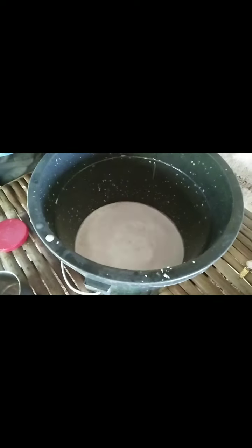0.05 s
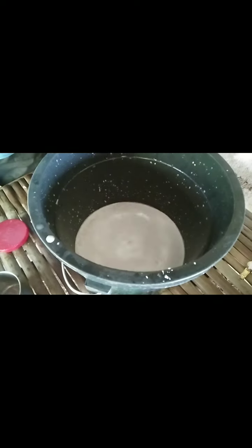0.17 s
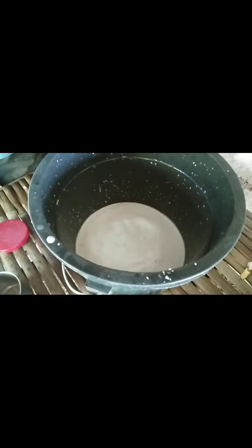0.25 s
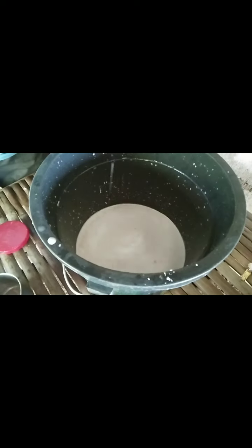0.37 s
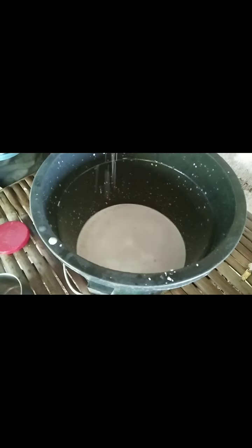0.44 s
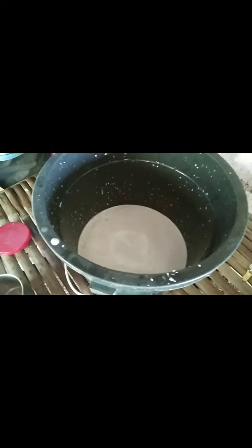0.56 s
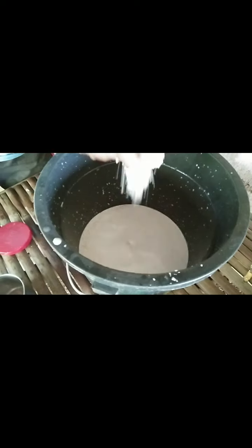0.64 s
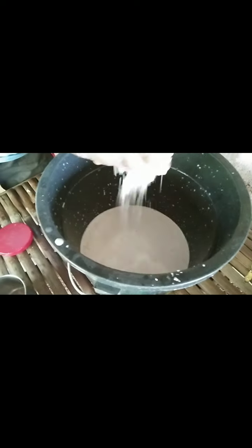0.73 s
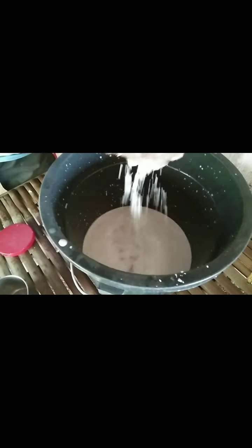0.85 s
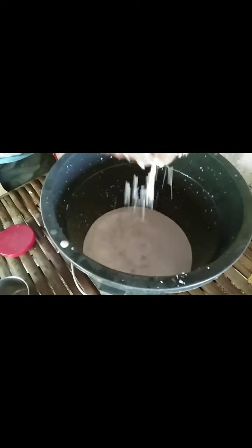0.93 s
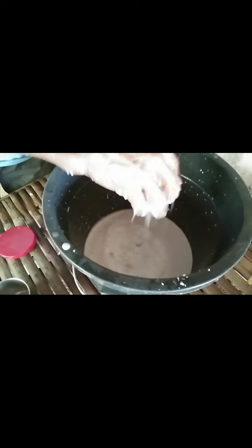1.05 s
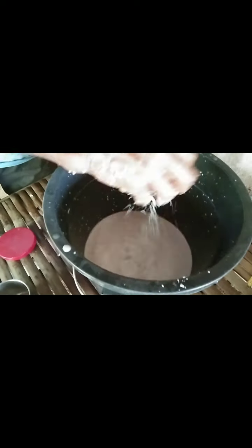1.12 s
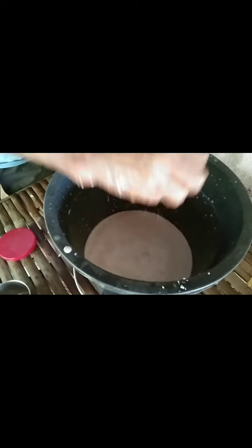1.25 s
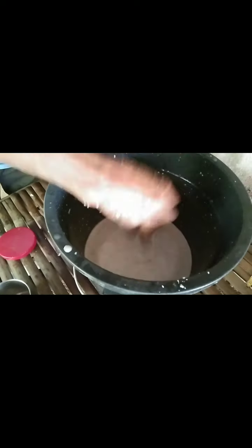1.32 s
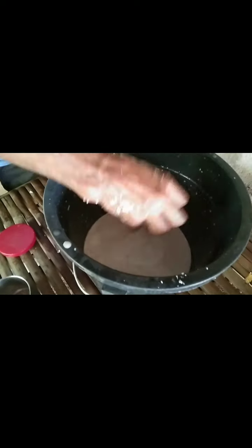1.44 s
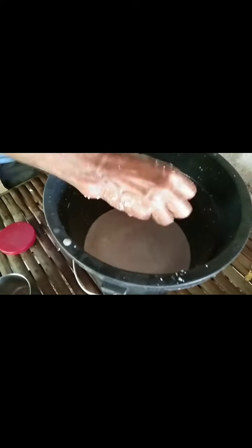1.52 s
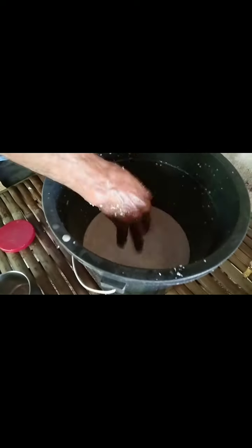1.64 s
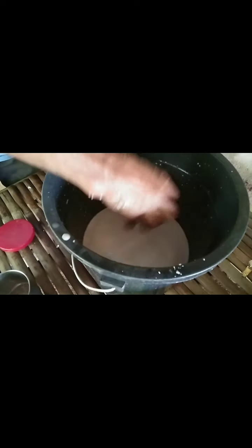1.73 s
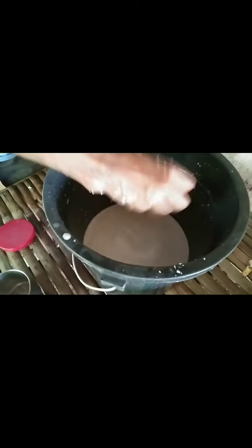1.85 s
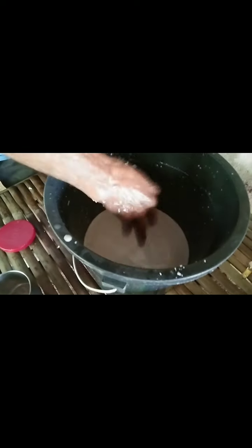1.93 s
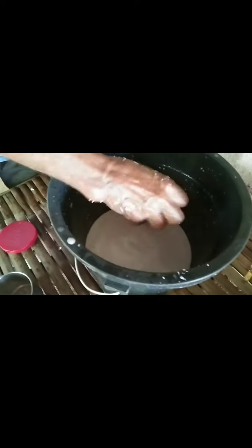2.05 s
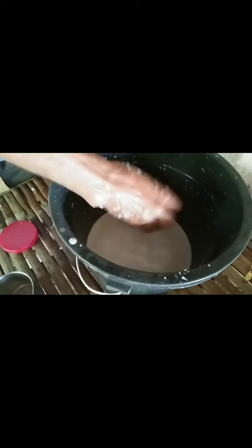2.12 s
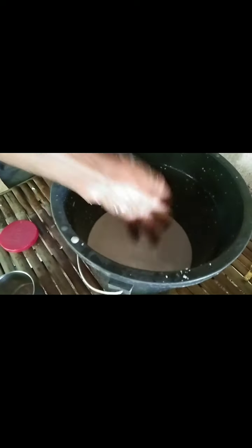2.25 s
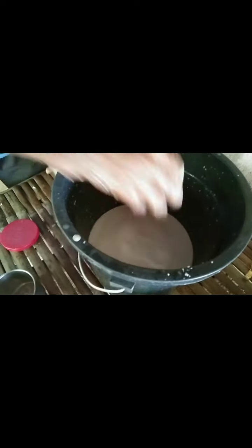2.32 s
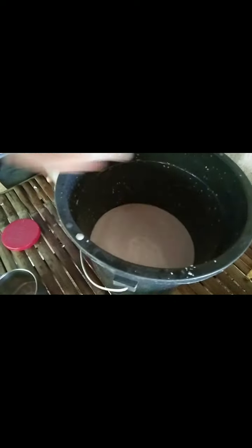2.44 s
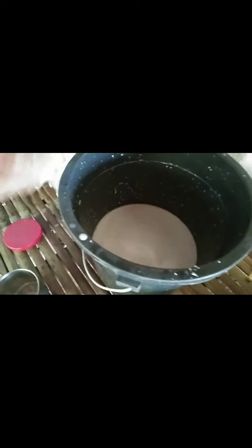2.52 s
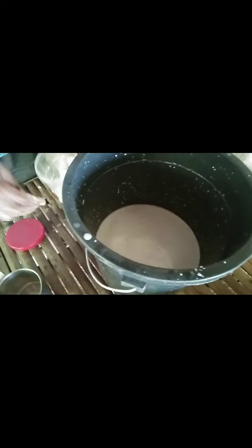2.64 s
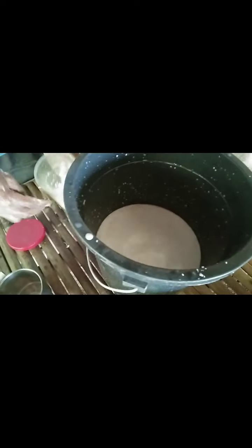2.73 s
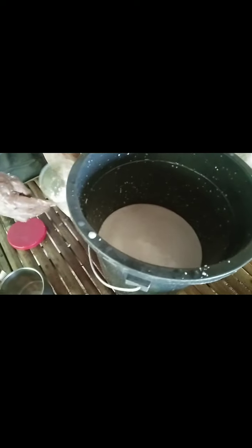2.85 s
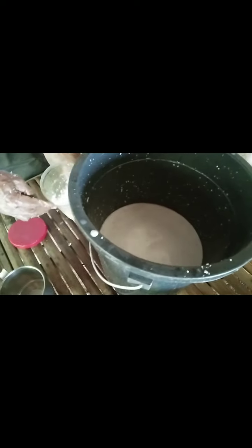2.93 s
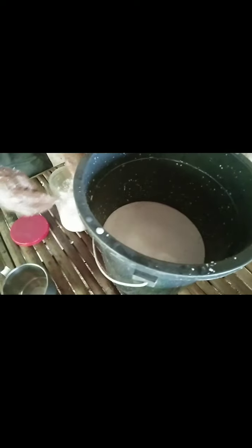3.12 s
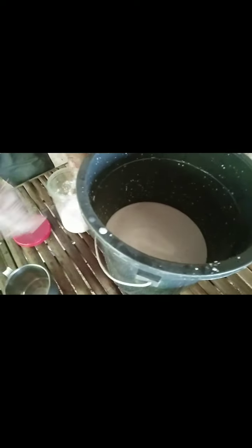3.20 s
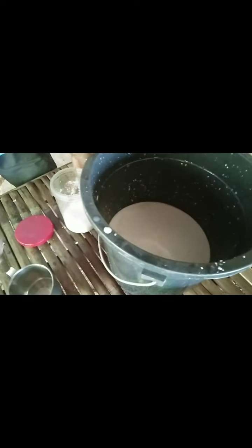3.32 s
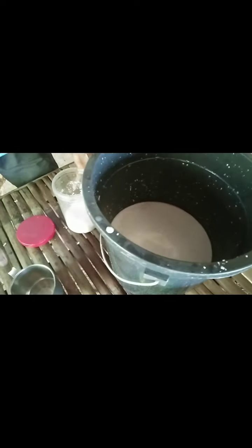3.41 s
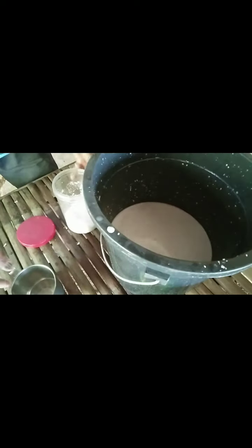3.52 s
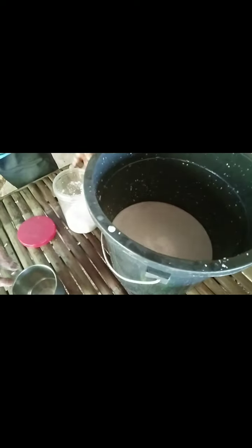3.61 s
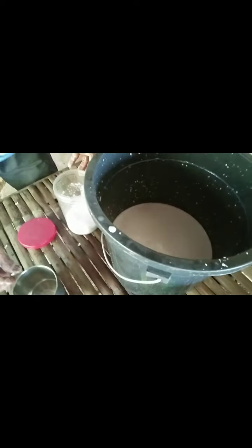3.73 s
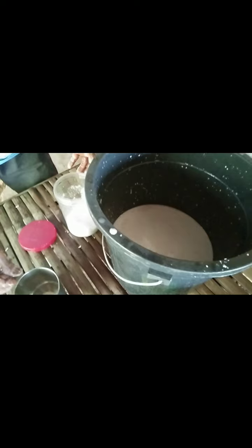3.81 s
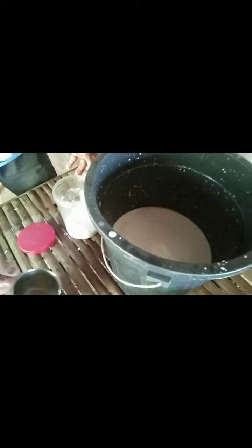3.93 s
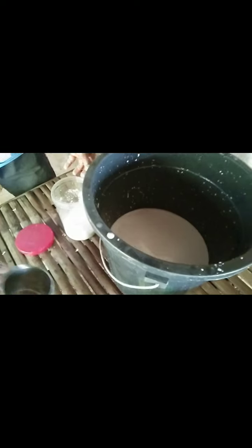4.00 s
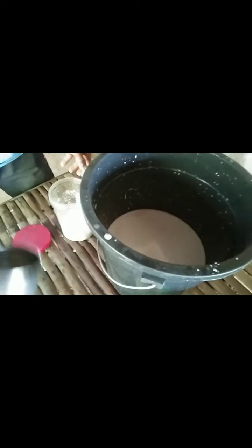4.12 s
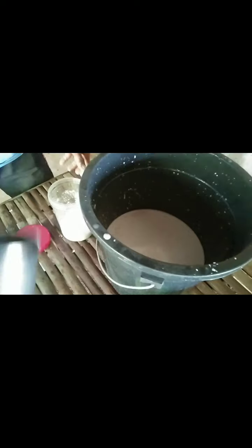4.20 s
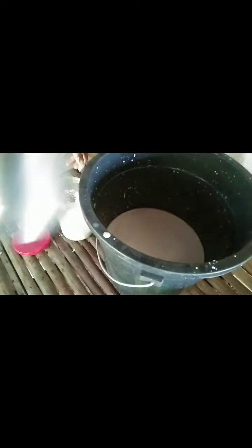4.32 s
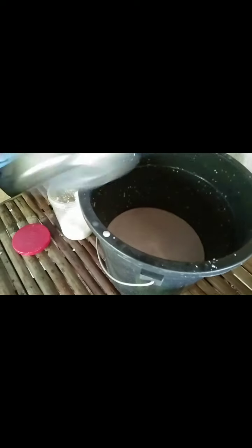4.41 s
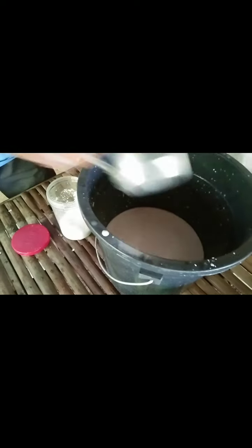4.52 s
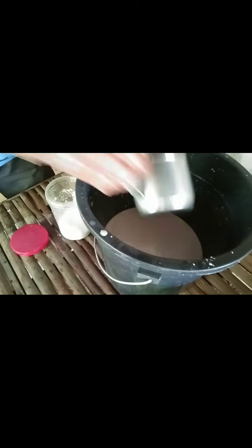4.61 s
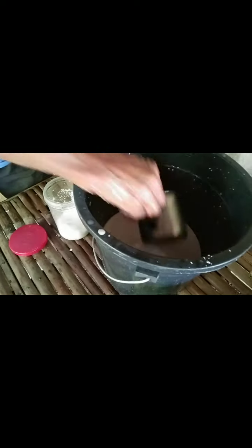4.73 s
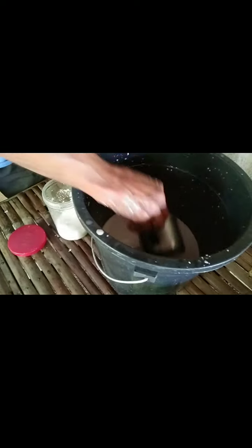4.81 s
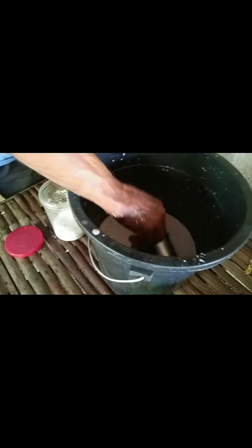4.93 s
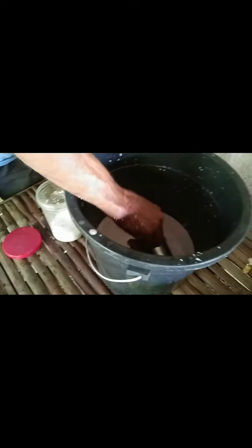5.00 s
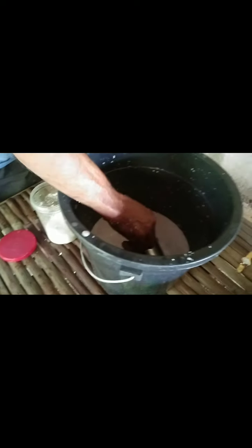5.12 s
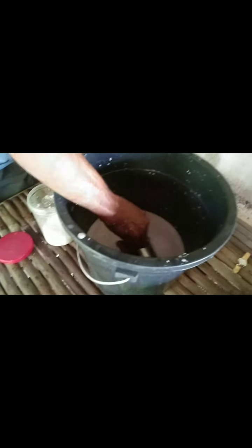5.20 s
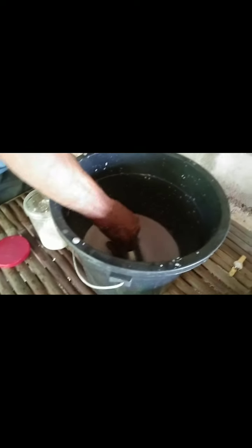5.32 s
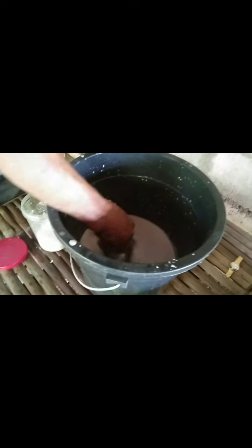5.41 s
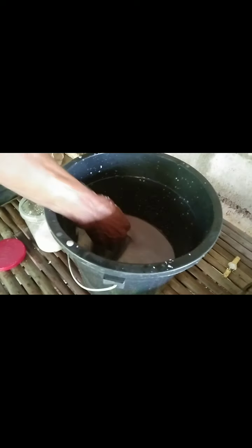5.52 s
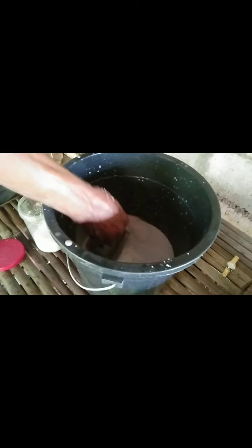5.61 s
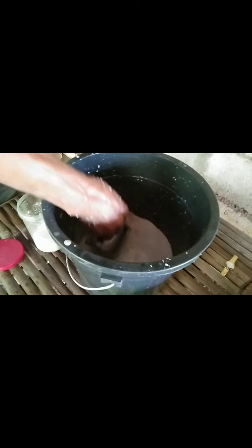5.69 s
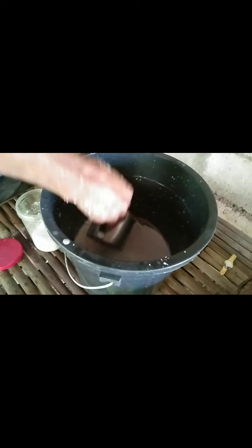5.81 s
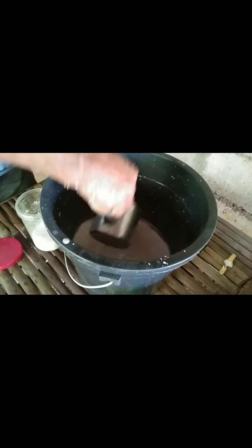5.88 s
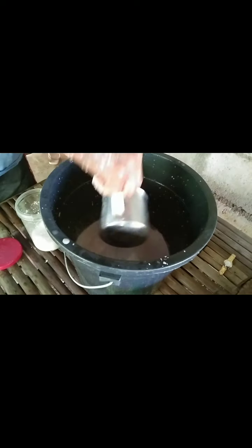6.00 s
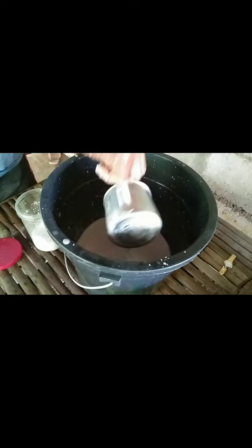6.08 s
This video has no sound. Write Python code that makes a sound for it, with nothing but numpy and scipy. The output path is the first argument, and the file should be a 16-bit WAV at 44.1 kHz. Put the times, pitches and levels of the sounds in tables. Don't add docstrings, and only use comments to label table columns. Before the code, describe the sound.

Soft wet ticks and rubbing hiss, a sharp plastic lid clatter, a brief steel ring, then gurgling, splashing stirring in a bucket, with distant roosters.

```python
import sys
import numpy as np
from scipy import signal
from scipy.fft import rfft, irfft, next_fast_len
from scipy.io import wavfile
from scipy.ndimage import uniform_filter1d, map_coordinates

SR = 44100
rng = np.random.default_rng(int(sys.argv[2]) if len(sys.argv) > 2 else 0)


def magnitude_from_level(level_db):
    exponent = np.asarray(level_db, float) / 20
    return 10 ** exponent


def persist_wave(psi):
    counts = np.round(np.clip(psi, -1, 1) * 32767).astype(np.int16)
    wavfile.write(sys.argv[1], SR, np.atleast_2d(counts).T)


N = 271215
TIME_S = np.arange(N) / SR

# freq_hz, level_db
RUMBLE_SPECTRUM = [(13, -60.5), (22, -11.5), (27, -25), (58, -0.5), (75, 1.5), (162, -0.5), (222, -3.5),
                   (330, -24), (430, -56), (730, -120)]
# freq_hz, density_db_per_hz
FLOOR_SPECTRUM = [(250, -8.5), (500, -7), (1200, -19.5), (2500, -14), (4300, -10), (5600, -13), (7400, 5),
                  (8600, -21.5), (16000, -48)]
# freq_hz, density_db_per_hz
LEAF_SPECTRUM = [(5500, -50), (6700, -11), (7500, 1.5), (8100, -13), (9000, -50.5)]
# peak_s, level_db, rise_20db_s, fall_20db_s
GUSTS = [
    (2.75, -59.5, 0.35, -0.4),
    (3.7, -70.5, 0.25, 0.6),
    (4.73, -61.5, .02, 0.5),
]
RUMBLE_DB, FLOOR_DB = -62.5, -77

# start_s, length_s, second_harmonic_hz, level_db
CROWS = [
    (0.01, 0.435, 1430, -85.5),
    (0.442, 0.23, 1890, -76.5),
    (0.79, 0.21, 1746, -79.5),
    (1.193, 0.51, 1704, -80.5),
    (1.593, 0.41, 1376, -89),
    (1.98, 0.24, 1604, -79),
    (2.403, 0.52, 1744, -74),
    (3.453, 0.39, 1513, -75.5),
    (4.22, 0.2, 1366, -83),
]
# start_s, length_s, pitch_hz, level_db
CLUCKS = [
    (.12, .1, 620, -75),
    (.36, .17, 455, -73),
    (1.16, .14, 530, -74),
    (2.9, .2, 520, -76),
]
# start_s, length_s, level_db
CHORUS = [
    (0.243, 0.4, -78.5),
    (0.77, 0.35, -78.5),
    (1.07, 0.86, -75.5),
    (2.19, 0.86, -74.5),
    (2.801, .4, -73.5),
    (3.68, 0.76, -72.5),
    (4.451, 0.92, -74.5),
]
# freq_hz, density_db_per_hz
CHORUS_SPECTRUM = [(400, -70), (560, -41), (700, -2.5), (790, 5), (880, -8.5), (1000, -44), (1500, -70)]
CROW_EDGE_S, CROW_FADE_DB = 0.11, -4.5
CROW_SAG = 0.0299

# freq_hz, t60_s
YARD_T60 = [(200, 0.64), (2000, 0.26), (7000, 0.15), (14000, 0.075)]

# start_s, peak_db, pitch_hz, t60_s
KNOCKS = [(1.331, -42.5, 131, 0.026), (1.779, -43, 103, 0.076), (2.232, -42.5, 231, 0.047),
          (2.812, -31, 240, 0.063), (2.838, -28, 169, 0.06), (3.269, -19.5, 211, 0.034),
          (3.617, -56.5, 129, 0.047), (3.908, -40, 196, 0.064), (4.118, -47, 93.3, 0.064),
          (4.482, -45, 774, 0.1), (4.691, -44, 91.3, 0.11), (5.189, -49.5, 91, 0.15),
          (5.475, -37.5, 603, 0.073), (5.82, -33, 1000, 0.021)]

# start_s, peak_db, bench_db, edge_pitch_hz
LID_BLOWS = [
    (3.1762, -22, -3.5, 5000),
    (3.1812, 2, -30, 6210),
    (3.186, -9, -15.5, 7000),
    (3.2225, 1, -20, 4110),
    (3.231, -13, -17.5, 4140),
    (3.2907, -11, -24, 4100),
    (3.319, -8, -14, 4400),
    (3.361, -23, -26.5, 5500),
    (3.368, -16, -19.5, 4100),
]
# freq_hz, width_hz, level_db
LID_MODES = [(2370, 110, -1), (2850, 50, -1), (4100, 500, -8.5), (5050, 260, -3), (6200, 600, -3),
             (7200, 600, -3), (8230, 460, -7.5)]
# freq_hz, density_db_per_hz
LID_SPECTRUM = [(350, -30), (750, -7), (1240, -9), (2600, -8), (3300, -7), (4300, -5), (6500, -8),
                (8300, -12), (13800, -32.5), (16000, -58)]
# freq_hz, width_hz, level_db
BENCH_MODES = [(115, 180, -8.5), (207, 42, -5.5), (477, 150, -2), (860, 56, -3.5), (1290, 200, 1)]
EDGE_DB, EDGE_T60_S = -6.5, 0.012

# freq_hz, level_db, t60_s
RIM_MODES = [(4830, -7.5, .5), (5470, -15, .4), (6288, -8, .3), (6560, -8, .4), (6918, 2.5, .3),
             (7240, -8, .7), (8050, -10, .2), (8270, -5, .3), (9150, -19, .2), (9437, -14, .25),
             (10410, -25, .2), (10700, -22, .3), (11500, -22, .2), (12700, -31, .2)]
# freq_hz, level_db, t60_s
WALL_MODES = [(1243, -7.5, 0.1), (1460, -2, 0.13), (2085, 2, 0.33), (2160, -5, .05), (2570, -4.5, 0.86),
              (2680, 2.5, .053), (2970, -3, 0.29), (3540, -8, .2), (4330, -12, .2), (4818, -2, 1),
              (5500, -15, .3)]
# start_s, level_db
TAPS = [
    (3.909, -57),
    (3.998, -53),
]
# peak_s, level_db, rise_20db_s, fall_20db_s
JERK = (4, -37.5, -0.0032, 0.12)

# start_s, peak_db, pitch_hz, t60_s, rise_share (pitch gains twice this by t60_s)
BUBBLES = [(5.225, -35, 3194, 0.072, 0.14), (5.2855, -22.5, 841, 0.025, 0.17),
           (5.302, -36, 916, 0.068, 0.51), (5.392, -36.5, 2780, 0.078, 0.068), (5.406, -41, 2510, .04, .05),
           (5.448, -30.5, 367, 0.048, 0.27), (5.457, -38.5, 532, 0.062, 0.27),
           (5.474, -33, 1155, 0.044, 0.066), (5.492, -39, 900, .04, .4), (5.505, -36.5, 1347, 0.067, 0.093),
           (5.538, -32, 1697, 0.054, 0.098), (5.595, -39, 1216, .04, .2), (5.759, -37.5, 1097, 0.088, 0.38),
           (5.799, -39.5, 830, 0.028, 0.17), (5.819, -33, 1740, .04, 0.14), (5.878, -42, 3220, .05, 0.14),
           (5.962, -41, 1750, 0.032, 0.057), (5.988, -39.5, 1243, 0.044, 0.24),
           (6.006, -44.5, 830, 0.16, 0.031), (6.041, -28, 1285, 0.025, .1),
           (6.089, -36.5, 820, 0.063, 0.0091), (6.115, -37, 2570, 0.047, 0.13), (6.132, -45.5, 827, .1, 0)]
# start_s, peak_db, pitch_hz, t60_s
PLOPS = [(1.0, -47, 1785, 0.084), (1.232, -53, 2175, 0.2), (2.841, -43, 518, 0.065),
         (2.813, -43.5, 518, 0.056), (2.82, -64.5, 2590, 1.0), (2.842, -52, 1010, 0.045),
         (2.929, -47, 4685, 0.068), (3.79, -62.5, 9230, 0.26), (3.8, -56.5, 6330, 0.24),
         (4.49, -53, 570, 0.19), (4.495, -54, 1118, 0.22), (4.5, -55.5, 1944, 0.13), (4.5, -55, 2940, 0.1),
         (4.505, -44, 3700, 0.13), (4.685, -61.5, 818, 0.092), (4.69, -70, 2400, 0.19),
         (4.69, -63.5, 4330, 0.11), (2.815, -52, 2190, 0.17), (3.915, -53, 645, 0.096)]
# from_s, to_s
SLOSH_FROM_S, SLOSH_TO_S = (5.2, 6.15)

# start_s, peak_db, pitch_hz
DRIPS = [
    (4.293, -48, 6290),
    (4.498, -43.5, 3750),
    (4.555, -42.5, 7300),
    (4.8319, -37.5, 6880),
    (4.9851, -23, 7340),
    (5.1824, -40.5, 4660),
]
# start_s, peak_db, pitch_hz
SPATTER = [(5.2148, -42, 5170), (5.2259, -32.5, 3330), (5.3052, -41.5, 6140), (5.3144, -39, 7340),
           (5.3603, -42, 4600), (5.3714, -42, 4970), (5.3805, -33.5, 6400), (5.3915, -30.5, 6640),
           (5.4053, -31, 6660), (5.4077, -35.5, 2810), (5.4396, -35, 6800), (5.448, -32, 6450),
           (5.4726, -34, 6200), (5.4869, -26.5, 5280), (5.5107, -30.5, 7630), (5.5204, -31, 6630),
           (5.5387, -22, 4390), (5.5443, -26.5, 4400), (5.5603, -18.5, 6280), (5.567, -32, 5840),
           (5.5743, -36, 6800), (5.5936, -44, 7950), (5.6044, -39, 7560), (5.6236, -43, 4570),
           (5.637, -32.5, 8740), (5.642, -29.5, 6200), (5.6484, -29.5, 7850), (5.6736, -42.0, 8100),
           (5.7265, -17.5, 5680), (5.7332, -26, 5810), (5.7388, -26.5, 6650), (5.7448, -35, 7560),
           (5.772, -46, 3170), (5.793, -29, 3700), (5.805, -24.5, 6800), (5.8126, -35, 6850),
           (5.828, -33, 3200), (5.8316, -29.5, 5190), (5.8403, -21.5, 7950), (5.8462, -25.5, 9800),
           (5.88, -25, 3200), (5.8862, -22.5, 7000), (5.8912, -24.5, 3640), (5.8983, -29.5, 3600),
           (5.933, -24.5, 7700), (5.9405, -23.5, 4320), (5.9473, -29, 3880), (5.958, -33, 5600),
           (5.9677, -30, 4300), (5.9815, -34, 6760), (5.9882, -28, 7200), (6.003, -26.5, 5790),
           (6.006, -27, 4800), (6.0419, -21, 6700), (6.052, -29, 6850), (6.08, -36.5, 4000),
           (6.0914, -21.5, 7840), (6.1158, -28.5, 3060), (6.1329, -22.5, 7370), (6.1398, -29.5, 7300)]
# start_s, peak_db, pitch_hz
TICKS = [(0.0665, -36.5, 5000), (0.1355, -37.5, 7970), (0.2302, -49, 7300), (0.32, -46, 7500),
         (0.336, -47, 4900), (0.3574, -43, 7260), (0.37, -35.5, 4630), (0.3844, -39, 5580),
         (0.399, -34, 4830), (0.4254, -31, 4800), (0.4862, -37, 5700), (0.502, -37, 8010),
         (0.5414, -43, 6940), (0.6364, -53, 7520), (0.689, -37.5, 6100), (0.6978, -44.5, 6230),
         (0.9085, -48, 7300), (0.92, -35, 8300), (0.939, -40, 6240), (0.95, -38, 3840),
         (0.9578, -39.5, 3920), (0.9861, -28.5, 5300), (0.994, -32, 7750), (1.002, -35, 8000),
         (1.021, -33.5, 6900), (1.104, -44.5, 5120), (1.231, -47.5, 5000), (1.29, -43.5, 7900),
         (1.3262, -33, 6360), (1.4082, -60.5, 7430), (1.4601, -31, 7570), (1.468, -36.5, 7300),
         (1.502, -48, 7300), (1.509, -45.5, 6650), (1.5383, -41, 5600), (1.578, -42.5, 7520),
         (1.5965, -43.5, 7700), (1.7184, -35.5, 7300), (1.733, -33.5, 4900), (1.7702, -47, 5020),
         (1.7792, -42, 7340), (1.8219, -40.5, 7140), (2.0424, -28.5, 7080), (2.0765, -41.0, 5020),
         (2.1023, -43.5, 5050), (2.2417, -32.5, 5840), (2.2828, -34, 8200), (2.2874, -36, 7320),
         (2.305, -50, 6050), (2.3402, -43, 7580), (2.541, -45, 6100), (2.549, -42.5, 5500),
         (2.9241, -47.5, 4250), (2.9453, -46, 4500), (3.032, -45.5, 4890), (3.0406, -45, 4710),
         (3.0619, -51, 4900)]
TICK_T60_S = 0.035
LEAN_DB = 14

# peak_s, peak_db, rise_20db_s, fall_20db_s, weight_db
STROKES = [(0.129, -50, 0.2, 0.3, -13), (.358, -44, 0.01, 0.05, -25), (.41, -40, 0.11, 0.27, -23.5),
           (0.518, -50.5, 0.2, 0.22, -14), (0.889, -55, -0.1, 0.5, -38),
           (0.992, -45.5, 0.0046, 0.18, -12.5), (1.29, -55.5, 0.1, 0.25, -25), (1.46, -47, 0.07, 0.18, -17),
           (1.73, -49.5, 0.12, 0.4, -12.5), (2.042, -42.5, 0.1, 0.15, -22), (2.231, -41, 0.001, .09, -10),
           (2.285, -46, 0.03, 0.2, -13), (2.541, -52, .001, .14, -12), (2.697, -61, 0.13, 0.12, -1),
           (2.82, -57.5, 0.01, 0.54, -16), (2.925, -58, 0.18, 0.16, -6.5), (3.04, -60.5, 0.13, 0.31, -14.5),
           (3.16, -51.5, -0.02, 0.5, -19), (3.64, -73, 1, 0.7, -23), (3.907, -59, 0.04, 0.46, -9.5),
           (4.0, -49.5, 0.08, 0.24, -12), (4.285, -57.5, 0.005, 0.05, -24), (4.491, -53, 0.01, 0.23, -6.5),
           (4.56, -54.5, 0.03, 0.32, -17.5), (4.69, -66, -0.2, 0.7, -11.5),
           (4.832, -52.5, 0.002, 0.22, -27.5), (4.986, -50, 0.01, 0.15, -21),
           (5.12, -56.5, -0.3, 0.9, -30.5), (5.541, -40, -0.0155, 0.13, -16.5), (5.836, -42, 0.03, 0, -17),
           (5.885, -39.5, 0.06, 0.09, -6.5), (5.938, -38.5, 0.01, 0.3, -9.5), (6.043, -41.5, 0.03, 0.1, -4)]
# stroke_db, air_db
BRIGHTEN = [(-68.5, -105), (-59.5, -82.5), (-49, -62), (-33.5, -55)]
# peak_s, level_db, fall_20db_s
SCUFFS = [
    (1.77, -77, 0.2),
    (2.23, -62, 0.16),
    (2.7, -69, 0.04),
    (2.82, -65.5, 0.33),
    (3.4, -76, -0.27),
    (3.909, -62, 0.32),
    (4.49, -56.5, 0.09),
    (4.685, -69.5, 0.23),
]
# time_s, effort_db
STIR = [(5.15, -89), (5.22, -62.5), (5.3, -58.5), (5.374, -61.5), (5.548, -44.5), (5.634, -54.5),
        (5.71, -57), (5.83, -47.5), (5.9, -58), (5.98, -64), (6.05, -51), (6.15, -47.5)]
# freq_hz, density_db_per_hz
FIZZ_SPECTRUM = [(1760, -42.5), (2600, -28), (3300, -10), (3900, 3.5), (6880, 6.5), (7910, 6.5),
                 (9500, -18), (12400, -40), (16000, -71)]
AIR_SPECTRUM = [(5290, -32.5), (9000, -3.5), (11000, -7.5), (14900, -20.5), (15800, -69.5)]
BODY_SPECTRUM = [(1300, -38), (1950, -4), (2600, -5.5), (3400, -4), (4200, -30), (7000, -70)]
HOLLOW_SPECTRUM = [(240, -16.5), (350, 0), (800, 5), (1200, 2.5), (1600, 6.5), (2100, -21), (4000, -60.5)]
WEIGHT_STEEP = 1.95
HEAVY_DULLS = 0.34
SCUFF_RISE_S = 0.008
STIR_FIZZ_DB, STIR_FIZZ_GROWS, STIR_AIR_DB, STIR_HOLLOW_DB = -46.5, 0.2, -20.5, -1.5
SPRAY_WET_PER_S, SPRAY_DRY_PER_S, SPRAY_STIR_PER_S = 250, 35, 900
DRY_S = 2.6

# freq_hz, level_db
MIC_RESPONSE = [(45, -18), (100, 3.5), (8000, -0.5), (10000, 0), (15000, -15.5), (15900, -32), (16300, -90)]
# freq_hz, turn_down_below_db
GATE = [(300, -130), (1000, -110), (2500, -101), (4000, -101), (7000, -102), (9000, -101), (15000, -112)]
OVERLOAD = 0.8
GATE_DEPTH_DB, TOP_HZ, SELF_NOISE_DB = -13, 15750, -93.5


def unit(x):
    return x / np.sqrt(np.mean(x ** 2) + 1e-20)


def along(points, hz):
    f, v = np.transpose(points)
    return np.interp(np.log(hz + 1), np.log(f + 1), v)


def wobble(knots_per_s):
    at = np.arange(0, N + 16, 16)
    curve = map_coordinates(rng.standard_normal(2000), [at * knots_per_s / SR])
    return np.interp(np.arange(N), at, curve)


def held(start_s, length_s, edge_s):
    inside_s = np.minimum(TIME_S - start_s, start_s + length_s - TIME_S)
    return np.clip(inside_s / edge_s, 0, 1)


def peaks(s, db, rise_s, fall_s, steep=1):
    t = TIME_S[::32, None] - s
    drop = np.where(t < 0, -t / (np.abs(rise_s) + 0.00083), t / (np.abs(fall_s) + 0.0019))
    level = magnitude_from_level(db - 20 * steep * drop).sum(axis=1)
    return np.interp(np.arange(N), np.arange(0, N, 32), level)


def puffs(s, db, t60_s, attack_s):
    env, t = np.zeros(N + SR), np.arange(SR // 5) / SR
    for at, level, life in zip(s, db, t60_s):
        burst = magnitude_from_level(level - 60 * t / (life + 0.001)) * (1 - np.exp(-t / attack_s))
        env[round(at * SR):][:len(t)] += burst
    return env[:N]


def pings(s, db, hz, t60_s, rise, attack_s, size):
    t = np.arange(size) / SR
    s, db, hz, t60_s, rise = (np.asarray(v, float)[:, None] for v in (s, db, hz, t60_s + 0.0014, rise))
    phase = 2 * np.pi * hz * (t + rise * t * t / t60_s)
    onset = (1 - np.exp(-t / np.reshape(attack_s, (-1, 1)))) ** 2
    wave = magnitude_from_level(db - 60 * t / t60_s) * onset * np.sin(phase)
    at = np.round(s * SR).astype(int) + np.arange(size)
    return np.bincount(at.ravel(), wave.ravel(), N + SR)[:N]


def filtered(x, response):
    m = next_fast_len(N + SR // 2)
    return irfft(rfft(x, m) * response(np.fft.rfftfreq(m, 1 / SR)), m)[:N]


def resonances(modes):
    def response(f):
        total = 0
        for k, (c, w, db) in enumerate(modes):
            total = total + (-1) ** k * magnitude_from_level(db) * 1j * f * w / (c * c - f * f + 1j * f * w)
        return total
    return response


def rush(spectrum, patchy_db, size=(4, 12)):
    z = signal.stft(rng.standard_normal(N + 512), nperseg=256)[2]
    field = uniform_filter1d(rng.standard_normal(z.shape), size[0], 0)
    field = uniform_filter1d(field, size[1], 1)
    x = signal.istft(z * magnitude_from_level(patchy_db * unit(field)), nperseg=256)[1][:N]
    return unit(filtered(x, lambda hz: magnitude_from_level(along(spectrum, hz))))


def background():
    rumble = magnitude_from_level(RUMBLE_DB + 2.1 * wobble(3.6)) * rush(RUMBLE_SPECTRUM, patchy_db=2.0)
    gusts = peaks(*np.transpose(GUSTS)) * rush(LEAF_SPECTRUM, patchy_db=2.5, size=(1, 30))
    floor = magnitude_from_level(FLOOR_DB + 2 * wobble(7.4)) * rush(FLOOR_SPECTRUM, patchy_db=6.5, size=(1, 40))
    return rumble + gusts + floor


def fowl():
    out = np.zeros(N)
    low, mid, top = (0.85 + 0.4 * wobble(110) for _ in range(3))
    waver = 0.011 * wobble(60)
    for s, length, hz, db in CROWS:
        part = np.clip((TIME_S - s) / length, 0, 1)
        phase = np.pi * np.cumsum(hz * (1 - CROW_SAG * part + waver)) / SR
        gain = held(s, length, CROW_EDGE_S) * magnitude_from_level(db + 10.5 + CROW_FADE_DB * (part - 0.5))
        out += gain * (mid * np.sin(2 * phase) + 0.37 * low * np.sin(phase) + 0.089 * top * np.sin(3 * phase))
    for s, length, hz, db in CLUCKS:
        arch = np.sin(np.pi * np.clip((TIME_S - s) / length, 0, 1))
        out += magnitude_from_level(db) * arch * low * np.sin(2 * np.pi * hz * TIME_S)
    chorus = sum(magnitude_from_level(db) * held(s, length, 0.15) for s, length, db in CHORUS)
    return out + chorus * rush(CHORUS_SPECTRUM, patchy_db=5.0)


def yard(x):
    hz, t, z = signal.stft(rng.standard_normal(SR // 2), SR, nperseg=256)
    decay = magnitude_from_level(-60 * t / along(YARD_T60, hz)[:, None])
    tail = signal.istft(z * decay, SR, nperseg=256)[1]
    return signal.fftconvolve(np.pad(x, (250, 0)), tail / np.linalg.norm(tail))[:N]


def knocks():
    s, db, hz, t60_s = np.transpose(KNOCKS)
    push = pings(s, db - 2.5, hz, 0.48 * t60_s, 0 * s, attack_s=0.002, size=5000)
    dull = rush(HOLLOW_SPECTRUM, patchy_db=5.0)
    return push + magnitude_from_level(-15.5) * puffs(s, db, 0.86 * t60_s, attack_s=0.0079) * dull


def lid():
    s, db, bench_db, hz = np.transpose(LID_BLOWS)
    edge = pings(s, db + EDGE_DB, hz, 0 * s + EDGE_T60_S, 0 * s, attack_s=0.0001, size=1500)
    edge = edge * (0.86 + 0.4 * wobble(900))
    contact = puffs(s, db + 3, 0 * s + 0.007, attack_s=0.0002)
    rattle = puffs(s, db - 11.5, 0 * s + 0.09, attack_s=0.0024)
    shell = unit(filtered(rng.standard_normal(N), resonances(LID_MODES)))
    shell = shell + 0.64 * rush(LID_SPECTRUM, patchy_db=3)
    blows = puffs(s, db + bench_db, 0 * s + 0.068, attack_s=0.003) * rng.standard_normal(N)
    bench = filtered(blows, resonances(BENCH_MODES))
    return edge + magnitude_from_level(-11) * (contact + rattle) * shell + magnitude_from_level(10) * bench


def cup():
    rough = peaks(*JERK) * magnitude_from_level(2.0 * wobble(90)) * rng.standard_normal(N)
    rim = resonances([(hz, 2.1 / max(t60_s, 0.03) + 14, db) for hz, db, t60_s in RIM_MODES])
    scale = np.std(filtered(rng.standard_normal(N), rim))
    rows = np.array([(s, tap_db + db, hz, t60_s + 0.27, 0) for s, tap_db in TAPS for hz, db, t60_s in WALL_MODES])
    rows[:, 1] += 3 * rng.standard_normal(len(rows))
    ring = pings(*rows.T, attack_s=0.0013, size=20000) * (0.55 + 0.3 * wobble(200))
    return magnitude_from_level(-2.0) * filtered(rough, rim) / scale + ring


def bubbles():
    s, db, hz, t60_s, rise = np.transpose(BUBBLES)
    big = pings(s, db + 2.2, hz, t60_s, rise, attack_s=0.0014, size=9000) * (0.85 + 0.25 * wobble(150))
    u = rng.random((420, 3))
    s = SLOSH_FROM_S + (SLOSH_TO_S - SLOSH_FROM_S) * u[:, 0] ** 0.7
    hz = 750 * 7 ** u[:, 1]
    db = -51 - 3.3 * np.log(u[:, 2] + 0.05)
    small = pings(s, db, hz, 18 / hz, 0 * s + 0.16, attack_s=0.00087, size=900)
    s, db, hz, t60_s = np.transpose(PLOPS)
    plops = pings(s, db, hz, t60_s, 0 * s, attack_s=0.003, size=9000) * (0.4 + 0.9 * wobble(260))
    return big + small + plops


def ticks(s, db, hz, t60_s, tone_db, puff_db, tail_db):
    tone = pings(s, db + tone_db, hz, 32 / hz, 0 * s + 0.05, attack_s=1.3 / hz, size=900)
    u = rng.random((len(s), 4))
    for late, off in (u[:, :2].T, u[:, 2:].T):
        near_hz = hz * 1.4 ** (off - 0.5)
        tone += pings(s + 0.003 * late, db + tone_db - 7.0, near_hz, 40 / hz, 0 * s + 0.055,
                      attack_s=2.3 / hz, size=900)
    bright = rush(FIZZ_SPECTRUM, patchy_db=4) + 0.24 * rush(AIR_SPECTRUM, patchy_db=3.0)
    for centre_hz in (3700, 5400, 7600):
        off_db = -LEAN_DB * np.abs(np.log2(hz / centre_hz))
        band = filtered(bright, lambda f: magnitude_from_level(-LEAN_DB * np.abs(np.log2((f + 1) / centre_hz))))
        tone += puffs(s, db + puff_db + off_db, t60_s, attack_s=0.00048) * band
    return tone + puffs(s, db + tail_db, 0 * s + 0.2, attack_s=0.0013) * bright


def splashes():
    s, db, hz = np.vstack([DRIPS, SPATTER]).T
    return ticks(s, db + 5, hz, 0 * s + 0.022, tone_db=1.5, puff_db=-12, tail_db=-35)


def flicks():
    s, db, hz = np.transpose(TICKS)
    return ticks(s, db + 4, hz, 0 * s + TICK_T60_S, tone_db=1.4, puff_db=-11, tail_db=-37.5)


def spray():
    rate = SPRAY_DRY_PER_S + SPRAY_WET_PER_S * held(-1, 1 + DRY_S, 0.1)
    rate = rate + SPRAY_STIR_PER_S * held(SLOSH_FROM_S, 2, 1)
    u = rng.random((1500, 4))
    s = np.interp(np.arange(len(u)) + u[:, 0], np.cumsum(rate) / SR, TIME_S, right=N / SR)
    hz = 6200 * np.exp(0.6 * (u[:, 1] - u[:, 2]))
    db = -5 * np.log(u[:, 3] + 0.033)
    pops = pings(s, db, hz, 18 / hz, 0 * s + 0.22, attack_s=0.00058, size=200)
    return pops / np.sqrt(np.abs(uniform_filter1d(pops ** 2, SR // 2)) + 1)


def motion():
    at, db, rise_s, fall_s, weight_db = np.transpose(STROKES)
    stir_db = np.interp(TIME_S, *np.transpose(STIR))
    froth = magnitude_from_level(STIR_FIZZ_DB + STIR_FIZZ_GROWS * (stir_db + 46.5))
    froth = froth * held(SLOSH_FROM_S, 2, 0.022) * magnitude_from_level(-2.5 + 3.4 * wobble(35))
    fizz = peaks(at, db, rise_s, fall_s) + froth
    dulling_db = HEAVY_DULLS * np.maximum(weight_db + 14, 0) * (at < SLOSH_FROM_S)
    air_db = np.interp(db, *np.transpose(BRIGHTEN)) - dulling_db
    air = peaks(at, air_db, rise_s, fall_s, steep=1.86) + froth * magnitude_from_level(STIR_AIR_DB + 0.5 * (stir_db + 49.5))
    body = peaks(at, db + weight_db, rise_s, fall_s, steep=WEIGHT_STEEP) + magnitude_from_level(stir_db - 1 + 3 * wobble(90))
    at, db, fall_s = np.transpose(SCUFFS)
    hollow = peaks(at, db, SCUFF_RISE_S, fall_s) + magnitude_from_level(stir_db + STIR_HOLLOW_DB)
    hiss = rush(FIZZ_SPECTRUM, patchy_db=2.5, size=(2, 30))
    top = magnitude_from_level(-3.5) * fizz * (0.8 * hiss + 0.5 * spray())
    top = top + magnitude_from_level(4.0) * air * rush(AIR_SPECTRUM, patchy_db=3.5)
    low = body * rush(BODY_SPECTRUM, patchy_db=3.5, size=(2, 25))
    low = low + hollow * rush(HOLLOW_SPECTRUM, patchy_db=3.5)
    return magnitude_from_level(2.0 * wobble(60)) * top + magnitude_from_level(2.3 * wobble(50)) * low


def scene():
    wet = flicks() + splashes() + bubbles()
    hard = lid() + knocks()
    near = wet + hard + magnitude_from_level(-19) * yard(wet) + magnitude_from_level(-8.5) * yard(hard)
    near = near / (1 + (near / OVERLOAD) ** 4) ** 0.28
    near = filtered(near, lambda hz: magnitude_from_level(along(MIC_RESPONSE, hz)))
    return (near + motion() + cup() + fowl() + background())[None]


def top_cut(x):
    return signal.sosfilt(signal.butter(12, 16360, fs=SR, output="sos"), x)


def record(dry):
    hz, _, z = signal.stft(dry, SR, nperseg=512)
    power = uniform_filter1d(np.abs(z) ** 2, size=3, axis=1)
    power = np.abs(uniform_filter1d(power, size=5, axis=2, origin=1)) + 1e-20
    noise = magnitude_from_level(2 * along(GATE, hz))[:, None]
    keep = np.clip(1 - noise / power, magnitude_from_level(2 * GATE_DEPTH_DB), 1) ** 0.5
    hiss = signal.stft(magnitude_from_level(SELF_NOISE_DB) * rng.standard_normal(dry.shape), SR, nperseg=512)[2]
    clean = signal.istft((z * keep + hiss) * (hz < TOP_HZ)[:, None], SR, nperseg=512)[1][:, :N]
    return top_cut(clean)


dry = scene()
out = record(dry)
persist_wave(out)
```